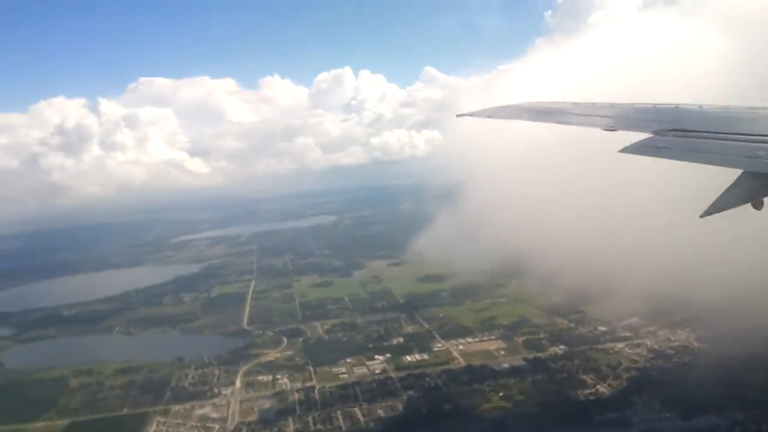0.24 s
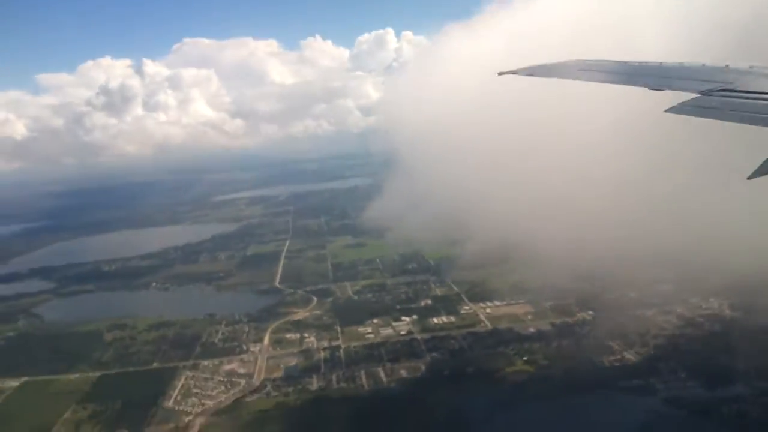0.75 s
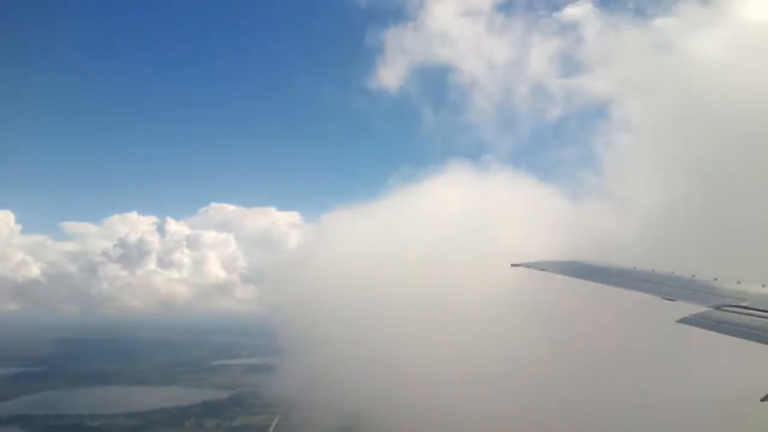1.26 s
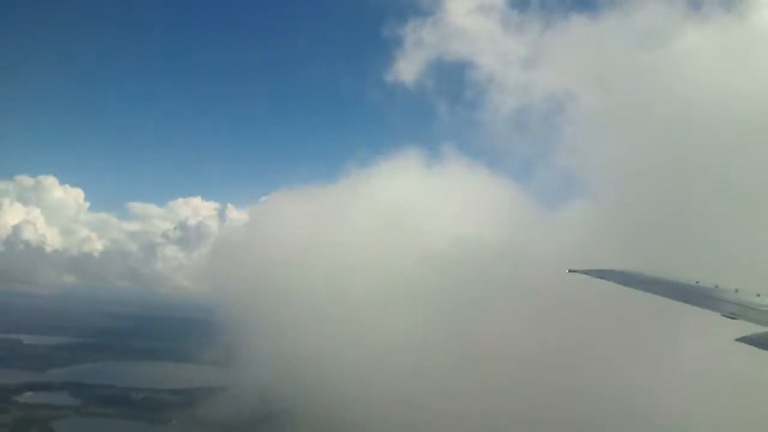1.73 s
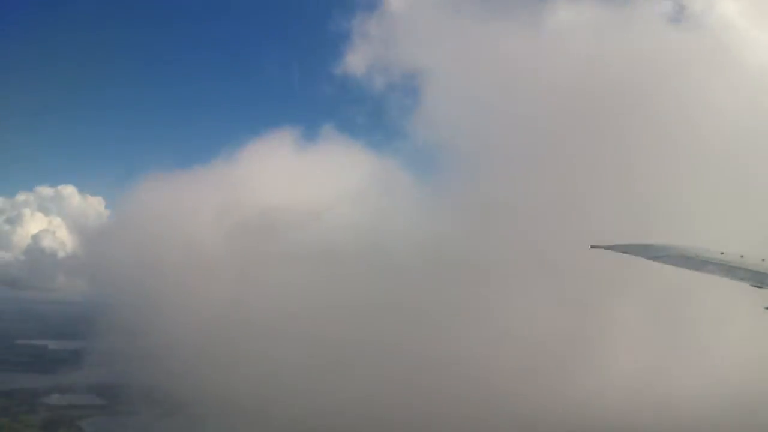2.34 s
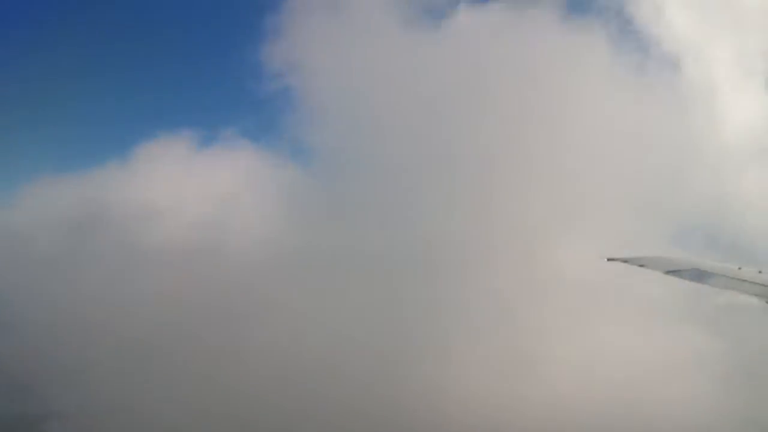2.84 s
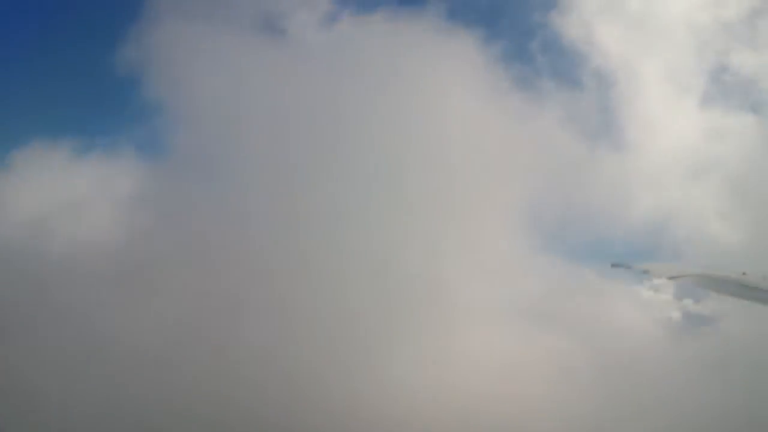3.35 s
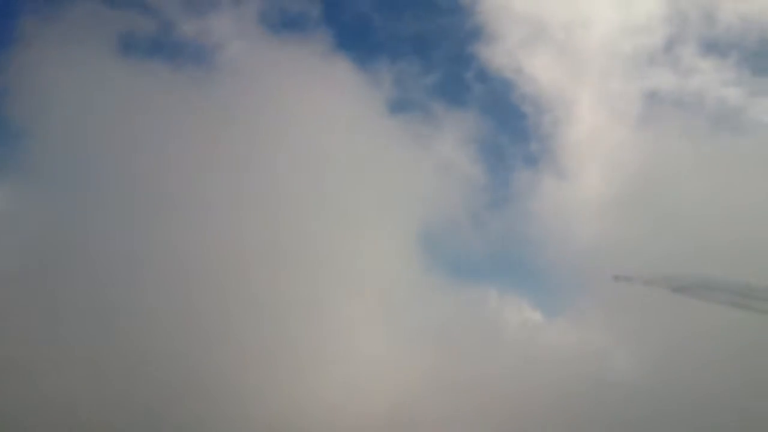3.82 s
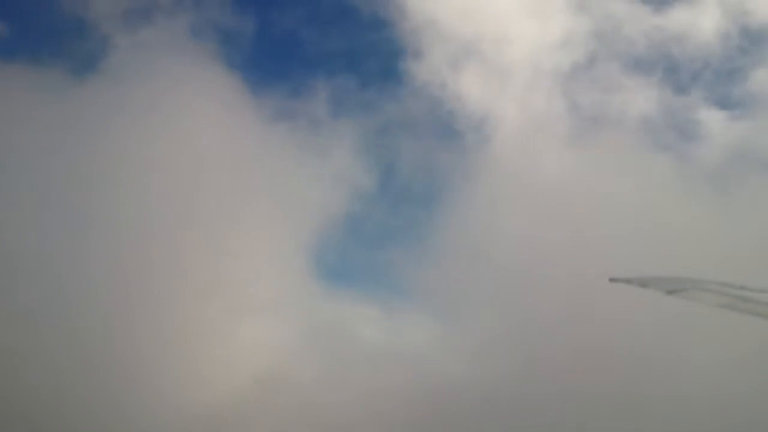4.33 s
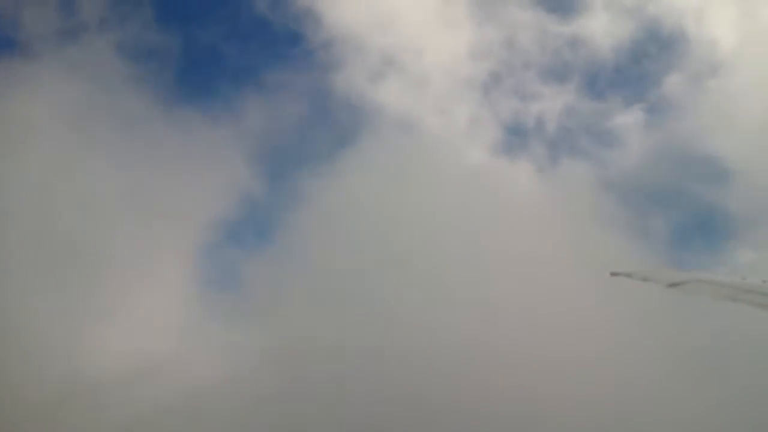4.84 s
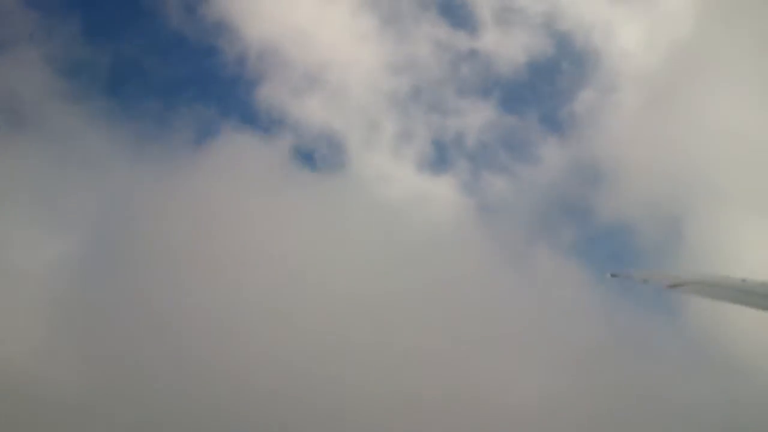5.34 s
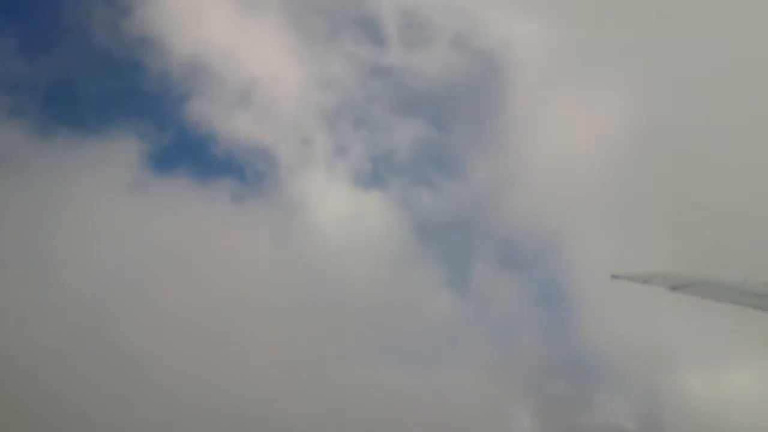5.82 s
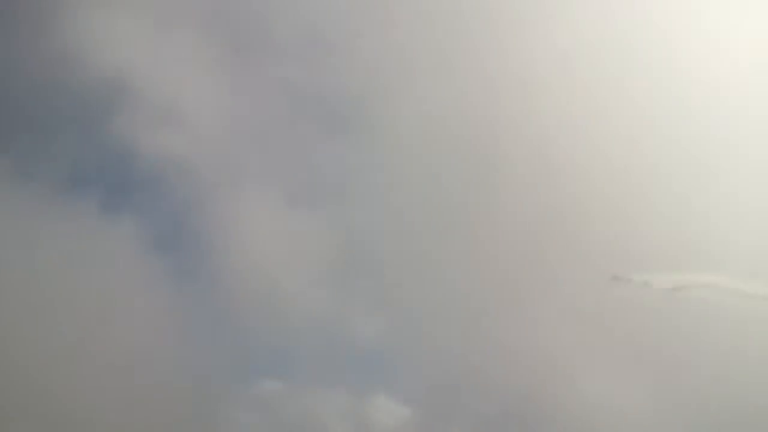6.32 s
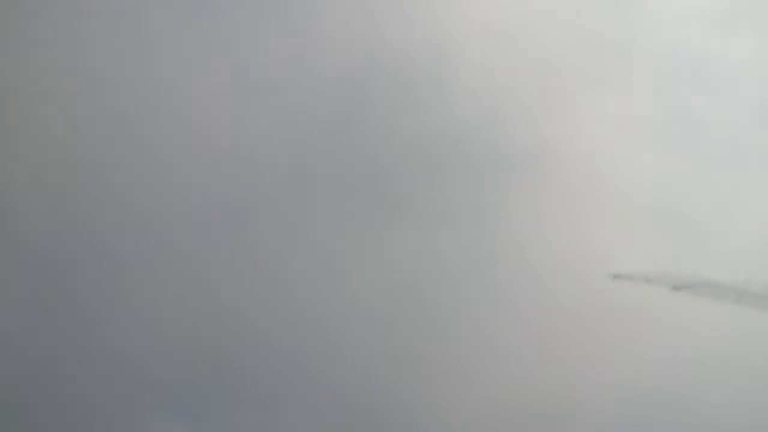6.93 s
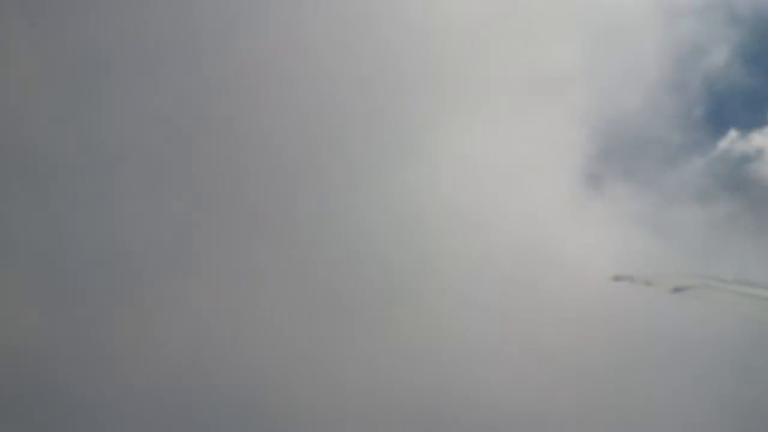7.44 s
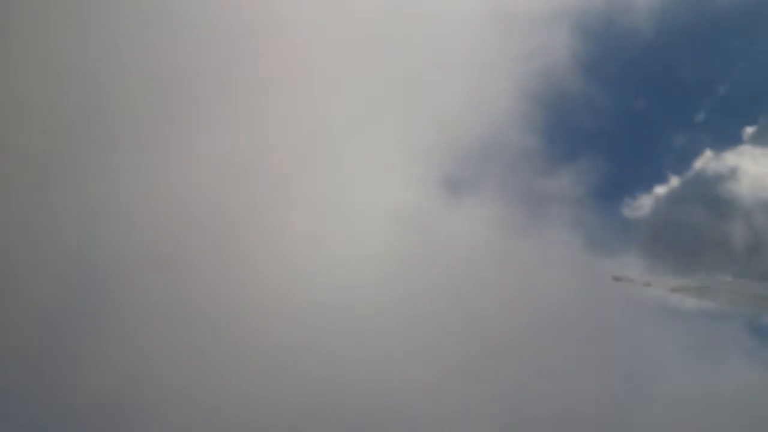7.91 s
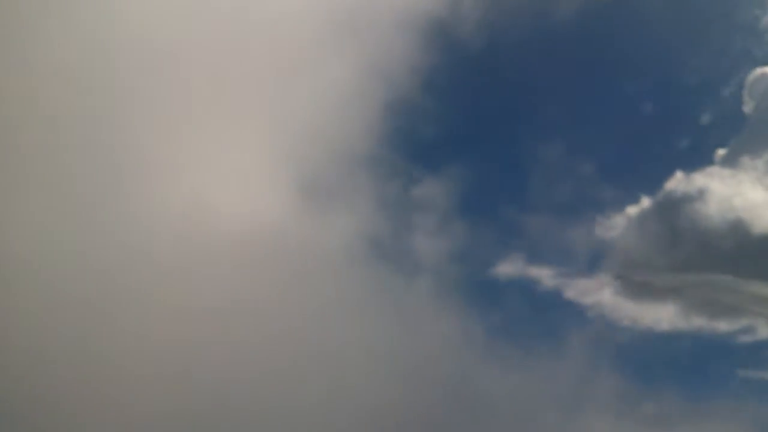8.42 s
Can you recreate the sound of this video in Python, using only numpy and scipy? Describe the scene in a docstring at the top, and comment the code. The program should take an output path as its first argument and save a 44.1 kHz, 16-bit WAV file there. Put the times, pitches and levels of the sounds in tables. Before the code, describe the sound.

A deep engine drone fills an airliner cabin in flight for nearly nine seconds, with a steady low roar of air and a light hiss. In the first half second, fingers faintly click and scrape on a plastic case close to the hand-held microphone. The drone dips around 0.7 seconds and returns at 0.9 with a thin, short rising squeak. It is strongest from about 2 to 4.5 seconds, where its peaks overload the microphone and chop the hiss. At 2.6 seconds come a few clicks, one sharp and joined by a knock. Near 3 seconds there is a short scrape between two dull pops, the second ringing briefly. Faint scattered clicks follow, ending with a clearer one at 5.8 seconds. The drone eases after 5 seconds and swells slightly near 7. Two quick dull pops sound at about 8.4 seconds as the rumble continues.

```python
"""Inside an airliner in flight, heard from a hand-held camera at the window.
From the start, a deep engine drone swells and sinks under the roar and hiss of air; its peaks overload
the microphone input. In the first second, fingers click, scrape and squeak on the plastic case and the
drone dips briefly. From 2.5 to 3 seconds come more clicks, a knock, a scrape and two dull pops, the second
with a brief ring. Clicks go on until about 6 seconds as the drone eases; two more pops come near the end."""
import sys
import numpy as np
from scipy import signal
from scipy.fft import rfft, irfft, next_fast_len
from scipy.io import wavfile
from scipy.ndimage import uniform_filter1d

SR = 44100
rng = np.random.default_rng(int(sys.argv[2]) if len(sys.argv) > 2 else 0)


def to_wav(s):
    """Save 16-bit WAV."""
    ch = np.atleast_2d(s).T  # columns
    pcm = np.round(np.clip(ch, -1, 1) * 32767)  # PCM
    wavfile.write(sys.argv[1], SR, pcm.astype(np.int16))


N = 382347
TIME = np.arange(N) / SR
MIC_TOP_HZ = 8044  # the microphone hears little above this


# How loud the engine drone is over time. Each row: time in seconds, level in dB.
DRONE_LEVELS = [(0, -10), (.68, -30.5), (.85, -8.5), (1.7, -8.5), (2.3, -5.3), (3.2, -8), (4.5, -5.5),
                (5.4, -14), (6.8, -10), (8.67, -13.5)]

def engines(shaft_hz=44.34, slowing_hz_per_s=.37, waver_db=-20.5, hum_hz=100.4, hum_settle_s=.54):
    """An unbalanced, slowing shaft shakes the cabin; rough air makes the tone waver. A hum lies above."""
    shaft_angle = 2 * np.pi * (np.cumsum(shaft_hz - slowing_hz_per_s * TIME) / SR + rng.random())
    waver = drift(rate_hz=10) * np.sin(shaft_angle) + drift(rate_hz=10) * np.cos(shaft_angle)
    hum = unit_level(np.sin(2 * np.pi * (hum_hz * TIME + rng.random())))
    hum_db = -30.5 + 18 * np.exp(-TIME / hum_settle_s)  # starts louder, soon settles
    drone_db = curve(DRONE_LEVELS) + .61 * drift(rate_hz=2.5)
    drone = unit_level(np.sin(shaft_angle))
    return gain(drone_db) * drone + gain(waver_db) * waver + gain(hum_db) * hum


# The roar of air on the outside of the plane. Each row: frequency in Hz, relative level in dB.
ROAR_COLOUR = [(12, -17.5), (28, -9), (50, 3.5), (72, -5), (125, 1.5), (160, -1.5), (205, 0), (265, -8),
               (310, -9.5), (400, -20.5), (530, -17.5), (760, -29), (1000, -33.5), (1500, -40.5),
               (3000, -54.5)]
# The hiss of the cabin air. Each row: frequency in Hz, relative level in dB.
HISS_COLOUR = [(500, -16), (1500, -6.5), (2400, -1), (3200, 0), (3800, -1), (5300, -4), (6300, -1.5),
               (7200, 1.5), (8000, 0.5), (10000, -8.5)]
# Hollows between hand and microphone that ring while a grip lasts.
# Each row: start in seconds, end in seconds, pitch in Hz, width in Hz, level in dB.
HAND_HOLLOWS = [(-.2, 1.002, 2060, 400, -51), (1.5, 4.8, 2960, 690, -51), (4.8, 8.898, 2900, 440, -51.5),
                (4.796, 8.9, 4200, 410, -51.5)]

def airflow(roar_db=-11, hiss_db=-40, grip_fade_s=.05):
    """Rough air roars through the wall; the cabin's hiss rings in the hollows of the hand."""
    roar = gain(roar_db) * noise(colour_from(ROAR_COLOUR))
    hiss = noise(colour_from(HISS_COLOUR)) * gain(hiss_db + .5 * drift(rate_hz=1.2))
    air = roar + hiss
    for start, end, hz, width, db in HAND_HOLLOWS:
        grip = np.clip(np.minimum(TIME - start, end - TIME) / grip_fade_s, 0, 1)
        air += gain(db) * grip * noise(lambda f: resonance(f, hz, width) ** 2)
    return air


# Clicks of the plastic case. Each row: start in seconds, level in dB, seconds to fade by 60 dB.
CASE_CLICKS = [(.139, -22, 0.017), (0.254, -26.5, 0.031), (2.571, -21, 0.022), (2.588, -7, 0.013),
               (2.618, -18.5, 0.013), (2.766, -21.5, 0.013), (3.72, -28.5, 0.093), (3.945, -24.5, 0.02),
               (4.314, -24.5, 0.022), (4.809, -28, 0.12), (5.2609, -24.5, .03), (5.7935, -13.5, 0.019)]

def clicks(rise_s=.00026, ticks_per_s=1.2, tick_db=-30.5, tick_fade_s=.037, ring_db=-11.5, ring_fade_s=.1):
    """Each slip of the plastic case gives a short burst of noise and a dull ring after it."""
    out, t = np.zeros(N), TIME[:4096]
    hz = np.fft.rfftfreq(len(t), 1 / SR)
    # fainter ticks come at random while the fingers settle
    ticking = (rng.random(N) < ticks_per_s / SR) & (TIME > 1) & (TIME < 4.8)
    ticks = [(start, tick_db, tick_fade_s) for start in TIME[ticking]]
    grit = rng.standard_normal(N + len(t))
    attack = 1 - np.exp(-t / rise_s)
    for start, db, fade_s in CASE_CLICKS + ticks:
        slip = rfft(grit[round(start * SR):][:len(t)])
        tilt = 6 - .28 * (db + 22.5)  # light clicks are bright, hard ones dull
        burst = unit_level(irfft(slip * case_colour(hz, tilt))) * gain(-60 * t / fade_s)
        ring = unit_level(irfft(slip * case_colour(hz, tilt_db_per_octave=-9)))
        ring *= gain(ring_db - 60 * t / ring_fade_s)
        add(out, start, gain(db) * (burst + ring) * attack)
    return out


# The tone of the plastic case. Each row: frequency in Hz, relative level in dB.
PLASTIC_COLOUR = [(300, -15), (800, 1.5), (1400, 0.5), (2000, -2.5), (2600, -0.5), (3600, -6), (4800, -3),
                  (5800, -4.5), (7200, -3.5), (10000, -6.5)]

def case_colour(hz, tilt_db_per_octave):
    """The case colours every click and scrape; tilting upward makes them brighter."""
    tilt_from_hz = PLASTIC_COLOUR[1][0]
    octaves = np.log2(np.maximum(hz, tilt_from_hz))
    in_range = hz < MIC_TOP_HZ + 1000
    return colour_from(PLASTIC_COLOUR)(hz) * gain(tilt_db_per_octave * octaves) * in_range


# Two brief rings: the first is heard as a knock, the second goes with a dull pop.
# Each row: start in seconds, strength in dB.
BRIEF_RINGS = [(2.5854, 6), (2.977, -3)]
# The notes in each ring. Each row: pitch in Hz, relative level in dB, seconds to fade by 60 dB.
RING_NOTES = [(483, -11, 0.062), (706, -9, 0.028), (960, -15, 0.0089), (1980, -20, 0.017),
              (2780, -24, 0.0086)]

def brief_rings():
    """A few notes start together and die away quickly."""
    out, t = np.zeros(N), TIME[:8192]
    ring = sum(gain(db - 60 * t / fade_s) * np.sin(2 * np.pi * hz * t) for hz, db, fade_s in RING_NOTES)
    for start, db in BRIEF_RINGS:
        add(out, start, gain(db) * ring)
    return out


# Dull pops. Each row: start in seconds, peak level in dB.
DULL_POPS = [(2.9025, -8), (2.975, -7), (8.3425, -5), (8.3743, -4.5)]

def pops(relax_s=.0036):
    """Each pop is a sudden jump that sinks back to rest."""
    out = np.zeros(N)
    for start, db in DULL_POPS:
        add(out, start, gain(db) * np.exp(-TIME[:1024] / relax_s))
    return out


# A finger slides over the case, lightly and later harder.
# Each row: time of the peak in seconds, level in dB, how fast it swells in dB per second.
FINGER_SLIDES = [(.39, -39, 85), (2.943, -25.5, 320)]

def scrapes(grain_db=3, fade_db_per_s=288):
    """Skin sliding on plastic makes a grainy noise."""
    grain = unit_level(uniform_filter1d(rng.standard_normal(N), size=90))
    strokes = sum(gain(db) * swell(peak_s, rise, fade_db_per_s) for peak_s, db, rise in FINGER_SLIDES)
    friction = noise(lambda f: case_colour(f, tilt_db_per_octave=3))
    return friction * strokes * gain(grain_db * grain)


def squeak(peak_s=.87, level_db=-29.5, pitch_hz=1000, glide_hz_per_s=2000, jitter_hz=18):
    """Skin sticking and slipping on plastic makes a thin, rising tone."""
    pitch = pitch_hz + glide_hz_per_s * (TIME - peak_s) + jitter_hz * drift(rate_hz=120)
    tone = unit_level(np.sin(2 * np.pi * np.cumsum(pitch) / SR))
    return gain(level_db) * tone * swell(peak_s, rise_db_per_s=380, fade_db_per_s=380)


def gain(db):
    """Turns decibels into a number to multiply by."""
    return 10 ** (np.asarray(db) / 20)


def unit_level(x):
    """Scales a sound so its average level (rms) is 1."""
    return x / np.sqrt(np.mean(x ** 2) + 1e-20)


def curve(rows):
    """Joins (seconds, value) rows with straight lines."""
    return np.interp(TIME, *np.transpose(rows))


def add(mix, start_s, sound):
    """Mixes a sound in at the given time."""
    part = mix[round(start_s * SR):][:len(sound)]
    part += sound[:len(part)]


def noise(colour):
    """Noise of level 1; colour(Hz) says how strong each frequency is."""
    size = next_fast_len(N)
    white = rfft(rng.standard_normal(size))
    return unit_level(irfft(white * colour(np.fft.rfftfreq(size, 1 / SR)), size)[:N])


def colour_from(rows):
    """Joins (Hz, dB) rows into a colour: a gain for every frequency."""
    hz, db = np.transpose(rows)
    return lambda f: gain(np.interp(np.log(f + 1), np.log(hz), db))


def resonance(f, pitch_hz, width_hz):
    """How strongly a hollow that rings at one pitch passes the frequencies f."""
    return f * width_hz / np.hypot(f ** 2 - pitch_hz ** 2, f * width_hz)


def drift(rate_hz):
    """A random wander of level 1 that changes up to the given rate."""
    return noise(lambda f: 1 / (1 + (f / rate_hz) ** 4))


def swell(peak_s, rise_db_per_s, fade_db_per_s):
    """A gain that climbs to 1 at peak_s and dies away again."""
    return gain(np.minimum((TIME - peak_s) * rise_db_per_s, (peak_s - TIME) * fade_db_per_s))


def scene():
    """The cabin and the small sounds close by, in mono."""
    return (engines() + airflow() + clicks() + brief_rings() + pops() + scrapes() + squeak())[None]


def record(dry, offset=-.044, ceiling=.705, hardness=28, top_hz=16000):
    """The input cuts the treble, sits off centre and flattens peaks, so loud drone crests chop the hiss."""
    mic_filter = signal.firwin(85, MIC_TOP_HZ, window=("kaiser", 7), fs=SR)
    off_centre = offset + signal.oaconvolve(dry, mic_filter[None], "same")
    flattened = off_centre / (1 + abs(off_centre / ceiling) ** hardness) ** (1 / hardness)
    top_filter = signal.firwin(511, top_hz, window=("kaiser", 9), fs=SR)
    return signal.oaconvolve(flattened, top_filter[None], "same")


dry = scene()
out = record(dry)
to_wav(out)
```